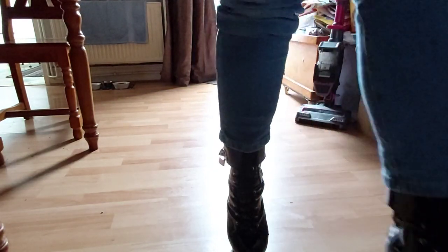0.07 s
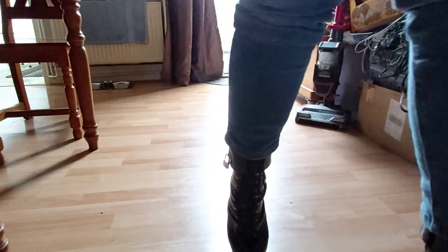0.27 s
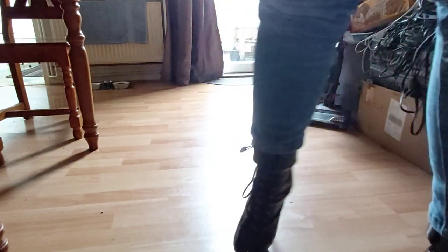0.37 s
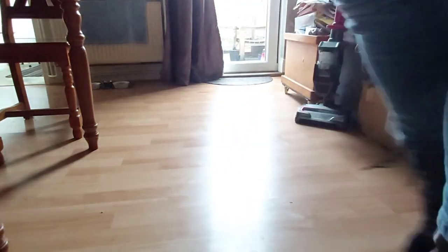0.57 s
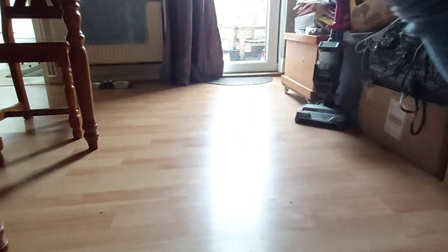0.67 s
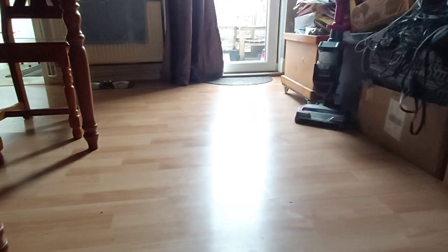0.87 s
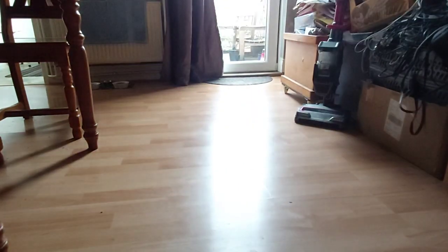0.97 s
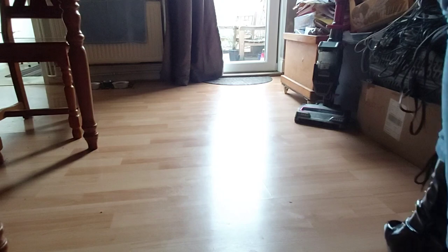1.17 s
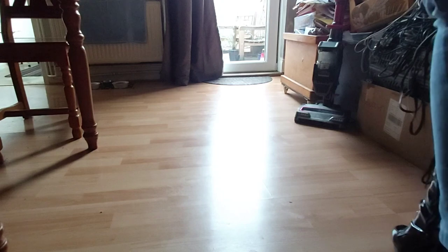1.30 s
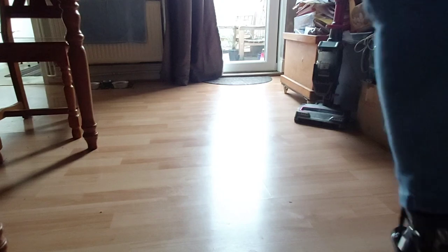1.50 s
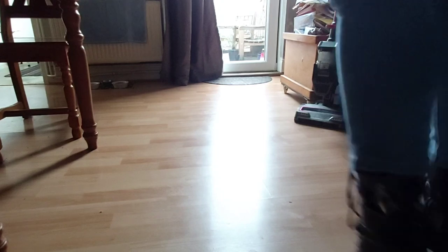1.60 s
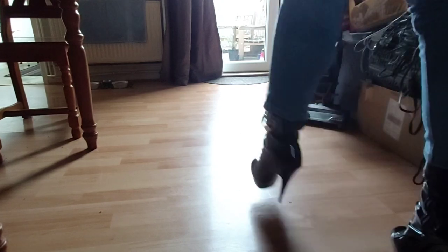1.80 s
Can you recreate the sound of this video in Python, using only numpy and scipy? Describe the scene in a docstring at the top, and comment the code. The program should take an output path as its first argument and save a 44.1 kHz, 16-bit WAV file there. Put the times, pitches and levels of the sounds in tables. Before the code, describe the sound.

Two heeled boot steps knock on a hard indoor floor, with faint clothing rustle.

```python
"""Heeled boots take two close steps on a laminate floor, one firm, one light, each a pair of contacts.
Every contact clacks the hard sole, knocks the boards, flexes the floor into a low thump and ring, and
jolts the microphone resting on it; ceiling and walls throw the sound back. Around the steps denim and
leather rustle and lace tips tick. A hand brushes a boot at the start, the leather creaks, and a sole
settles softly near the end. Faint hiss and a low hum lie underneath."""
import sys
import numpy as np
from scipy import signal
from scipy.fft import rfft, irfft, next_fast_len
from scipy.io import wavfile

SR = 44100
rng = np.random.default_rng(int(sys.argv[2]) if len(sys.argv) > 2 else 0)


def dump_mix(stems):
    """Bounce the given channels to the path in sys.argv[1] as a 16-bit WAV at rate SR."""
    frames = np.atleast_2d(stems).T  # one column per channel
    limited = np.clip(frames, -1, 1)  # hard clip at full scale
    pcm = np.round(limited * 32767).astype(np.int16)
    wavfile.write(sys.argv[1], SR, pcm)


N = 81585
KNOCK_PAN_DB, ECHO_SEND_DB, ROOM_SEND_DB = -3.5, -5.5, -4


def steps():
    """Each boot contact clacks, knocks and thumps the floor, and sets it and the room ringing."""
    # boot contacts: t/s, knock/dB, knock pitch/Hz, knock rise/s, thump/dB, ring/dB, clack/dB, send/dB
    contacts = [(0.2124, -14, 472, 0.00061, -25, -29.5, -27, 2),
                (0.2669, -6, 570, 0.0008, -18, -33, -17, -5.5),
                (1.2687, -25, 478, 0.00057, -52.5, -43.5, -43, 1.5),
                (1.3979, -19, 504, 0.00046, -44, -43.5, -45, 2.5)]
    out = 0
    for s, knock_db, hz, rise, thump_db, ring_db, clack_db, send_db in contacts:
        blow = undb(knock_db) * knock(s, hz, rise)
        flex = undb(thump_db) * thump(s)
        clack = undb(clack_db) * sole_clack(s)
        ring = undb(ring_db) * floor_ring_and_jolt(s)
        direct = place(blow, KNOCK_PAN_DB) + place(clack, pan_db=-11.5) + flex + ring
        send = undb(send_db) * (blow + clack)
        echoes = undb(ECHO_SEND_DB) * reflections(send)
        tail = reverb(undb(ROOM_SEND_DB) * send + undb(-1) * flex) * pan(0.5)
        out = out + direct + echoes + tail
    return out


def knock(s, hz, rise):
    """The board dips under the boot and springs back: a cycle or two, rounded by a low-pass."""
    t = since(s)
    pulse = -np.sin(2 * np.pi * hz * t) * swell(t, rise)
    lowpass = signal.butter(3, 2.3 * hz, fs=SR, output="sos")
    return signal.sosfilt(lowpass, delay(pulse, -0.000277))  # early, to offset the filter's lag


def thump(s, start_hz=184.1, end_hz=69, glide_s=0.02, rise_s=0.0075):
    """Bending waves spread through the floor, the lowest arriving last, so the pitch drops."""
    t = since(s)
    cycles = end_hz * t + (start_hz - end_hz) * glide_s * (1 - np.exp(-t / glide_s))
    return -np.sin(2 * np.pi * cycles) * swell(t, rise_s)


def sole_clack(s):
    """The hard sole rings for an instant and crushes a little grit."""
    # sole modes: f/Hz, level/dB, t60/s
    modes = [(904, -3, 0.0207), (1096, -1, 0.018), (1558, -9, 0.016), (1850, -19.5, 0.021),
             (2274, -19.5, 0.037), (2787, -16.5, 0.016)]
    t = since(s)
    ring = sum((-1) ** k * mode(t, hz, db, t60) for k, (hz, db, t60) in enumerate(modes))
    grit = undb(-6) * tick(s, bright_db=-7.5)
    return ring + grit


def floor_ring_and_jolt(s, build_s=0.0033):
    """The floor's modes ring and fade; the microphone resting on it is jolted, mostly on the left."""
    # microphone jolt (lowest row), then the floor's modes: f/Hz, level/dB, t60/s, left over right/dB
    resonances = [(42, -14, .17, 12), (56, 2.5, 0.068, 7.5), (100.2, 1.5, .27, 5.5), (138, 9.5, 0.094, 1),
                  (283.2, 2.5, .19, 0), (552, -31, 0.073, 0), (697, -9.5, 0.32, 2.5)]
    t = since(s)
    ring = sum(mode(t, hz, db, t60) * pan(side) for hz, db, t60, side in resonances)
    return ring * (1 - np.exp(-t / build_s))


def sole_settle():
    """The sole settles with a soft knock and thump."""
    # settling contact: t/s, knock/dB, knock pitch/Hz, knock rise/s, thump/dB
    contacts = [(1.5792, -40, 768, 0.0008, -55.5)]
    return sum(undb(db) * knock(s, hz, rise) + undb(thump_db) * thump(s)
               for s, db, hz, rise, thump_db in contacts)


def lace_ticks():
    """Lace tips and eyelets tap, some dull, some bright."""
    # taps: t/s, level/dB, brightness/dB
    taps = [(0.2345, -30.5, -7.5), (0.38, -31.5, -5), (0.4227, -32.5, -1.5), (0.4424, -35.5, -9),
            (0.4704, -31, -3.5), (0.5125, -32, -2), (0.5625, -43, 13.5), (0.637, -31, -0.5),
            (0.7555, -40, -6), (0.7998, -41, -13.5), (0.8121, -43.5, 17), (0.8581, -34, -6.5),
            (0.9676, -39.5, 2), (1.0061, -42.5, 11), (1.0389, -38.5, 14.5), (1.229, -46, 10.5),
            (1.265, -30.5, 2.5), (1.4615, -46.5, 10), (1.5424, -42, -7), (1.5795, -40, -3.5),
            (1.679, -38, 1), (1.7345, -34, 4.5)]
    return sum(undb(db) * tick(s, bright_db) for s, db, bright_db in taps)


def tick(s, bright_db, decay_s=0.0012):
    """Something small and hard cracks: a noise burst that dies at once, tilted dull or bright."""
    # tick spectrum before the tilt: f/Hz, level/dB
    spectrum = [(100, -42.5), (280, -21.5), (550, -10.5), (1200, -6), (2400, -3.5), (4000, -4),
                (8000, -10.5), (13000, -11), (16000, -14)]
    t = since(s)
    burst = rng.standard_normal(N) * (t > 0) * np.exp(-np.minimum(t / decay_s, 20))
    tilt_db = lambda f: 2 * bright_db * np.log10((f + 300) / 4000)
    return filtered(burst, lambda f: undb(along(f, spectrum) + tilt_db(f)))


def leather_creaks(width_hz=790, rise_s=0.0018):
    """The leather folds with short rasps."""
    # folds: t/s, level/dB, resonance/Hz
    folds = [(0.378, -57.5, 2200), (0.514, -48, 1883), (0.857, -51.5, 2130), (1.543, -67, 2630),
             (1.562, -62, 2612), (1.5776, -69, 2686)]
    return sum(undb(db) * band_noise(hz, width_hz) * swell(since(s), rise_s) for s, db, hz in folds)


def hand_brush(fade_s=0.027):
    """A hand slides off the boot with a hollow swish."""
    return undb(-53) * band_noise(hz=960, width_hz=350) * np.exp(-(since(0) / fade_s) ** 2)


def rustle(slips_per_s=1200, spread_db=5, blur_s=0.028):
    """Denim and leather rub: dense tiny slips follow the legs, and the room blurs them into a wash."""
    # leg movement: t/s, body level/dB, treble level/dB
    movement = [(0, -54, -58.5), (.05, -61, -66.5), (.1, -64, -69.5), (.19, -76, -71.5), (0.228, -50, -58),
                (.3, -47.5, -53), (.36, -54.5, -71), (0.438, -64.5, -56), (.5, -60, -67), (.58, -73.5, -63),
                (.65, -65, -65), (.73, -72, -72.5), (0.826, -55, -54), (.865, -56, -63), (.93, -71, -65),
                (0.973, -55, -65), (1.04, -70, -71), (1.119, -71, -72), (1.257, -78, -72.5),
                (1.27, -53.5, -51), (1.32, -65.5, -105), (1.385, -71.5, -72.5), (1.44, -61.5, -59),
                (1.521, -70, -75.5), (1.56, -62, -59.5), (1.624, -69.5, -69), (1.668, -60.5, -60),
                (1.71, -71.5, -69.5), (1.746, -66, -62), (1.79, -65, -70.5), (1.85, -68.5, -69)]
    # body of the rustle: f/Hz, level/dB
    body = [(100, -24.5), (300, -4.5), (600, -2.5), (900, 4.5), (1300, 0.5), (2300, 1), (3500, -11),
            (6000, -18), (16000, -30.5)]
    # treble of the rustle: f/Hz, level/dB
    treble = [(1000, -13), (3000, 2.5), (5500, 5.5), (9000, 0.5), (12500, 3.5), (16000, -9)]
    times, body_db, treble_db = np.array(movement).T
    hold = np.exp(-1 / (blur_s * SR))
    out = 0
    for levels_db, spectrum in ((body_db, body), (treble_db, treble)):
        envelope = undb(np.interp(since(0), times, levels_db))
        slips = (rng.random(N) < slips_per_s / SR) * rng.standard_normal(N)
        slips *= undb(spread_db * np.minimum(rng.exponential(size=N), 4))  # a few stick out
        friction = unit(colour(unit(slips) + rng.standard_normal(N), spectrum))
        lingering = np.sqrt(signal.lfilter([1 - hold], [1, -hold], envelope ** 2))
        wash = unit(colour(rng.standard_normal((2, N)), spectrum)) * lingering
        out = out + undb(-7) * place(friction * envelope, pan_db=-18) + undb(2) * wash
    return out


def reflections(x):
    """Distinct returns from ceiling, walls and furniture."""
    # early reflections: delay/s, left/dB, right/dB, extra left delay/s
    returns = [(.0018, -11, -22, .0002), (.0085, -11, -16, .0001), (.0141, -3, -7, .0001),
               (.0159, -7, -16, .0001), (.0224, -10, -8, .0001), (.0313, -11, -12, 0),
               (.0347, -16, -10, .0001), (.0377, -14, -13, .0001), (.0488, -12, -13, 0)]
    return sum(np.array([undb(left) * delay(x, s + lag), undb(right) * delay(x, s)])
               for s, left, right, lag in returns)


def reverb(x, length_s=0.5, build_s=0.005, shared_hz=756):
    """The room's diffuse tail, alike on both sides in the bass, drawn afresh for every send."""
    # room colour: f/Hz, level/dB
    spectrum = [(60, -18), (130, -22.5), (200, -8), (290, 10.5), (450, 4), (700, 5), (1200, -5),
                (3000, 5.5), (14000, -7.5)]
    # room decay: f/Hz, t60/s
    decay = [(80, 0.24), (300, .28), (700, 0.28), (2000, 0.23), (12000, .22)]
    t = np.arange(int(length_s * SR)) / SR
    noise = rng.standard_normal((3, len(t)))
    shared = lambda f: 1 / (1 + (f / shared_hz) ** 2)
    centre = filtered(noise[0], lambda f: np.sqrt(shared(f)))
    sides = filtered(noise[1:], lambda f: np.sqrt(1 - shared(f)))
    tail = 0
    for hz in 2. ** np.arange(6, 15):  # octave bands
        fade = undb(-60 * t / along(hz, decay)) * (1 - np.exp(-t / build_s))
        band = filtered(centre + sides, lambda f: np.maximum(1 - np.abs(np.log2((f + 1e-3) / hz)), 0))
        tail = tail + band * fade / np.sqrt(np.sum(fade ** 2))
    return signal.fftconvolve(colour(tail, spectrum), x[None], axes=1)[:, :N]


def room_tone(hum_hz=59, waver=0.2):
    """Faint hiss and a low, wavering hum."""
    # hiss spectrum: f/Hz, relative level/dB
    spectrum = [(15, -45.5), (25, -39.5), (61, -7.5), (217, -17.5), (301, -19.5), (384, -17), (439, -19.5),
                (641, -37), (2160, -28.5), (3080, -28.5), (16000, -37.5)]
    # rise and fall of the hum: t/s, level/dB
    hum_levels = [(0, -76.5), (0.749, -79.5), (.92, -70), (1.2, -70.5), (1.5, -73), (1.85, -79.5)]
    t = since(0)
    hum = np.sqrt(2) * np.sin(2 * np.pi * hum_hz * t) + waver * band_noise(hum_hz, width_hz=9)
    hiss = undb(-70.5) * unit(colour(rng.standard_normal((2, N)), spectrum))
    return hiss + hum * undb(np.interp(t, *np.array(hum_levels).T))


def undb(db):
    """Decibels to gain."""
    return 10 ** (np.asarray(db) / 20)


def unit(x):
    """Scale to rms 1."""
    return x / np.sqrt(np.mean(x ** 2))


def since(s):
    """Seconds since an event, zero before it."""
    return np.maximum(np.arange(N) / SR - s, 0)


def swell(t, rise):
    """An envelope that reaches 1 at the rise time, then dies away."""
    return t / rise * np.exp(1 - t / rise)


def mode(t, hz, db, t60):
    """One struck resonance: a decaying sine."""
    return undb(db - 60 * t / t60) * np.sin(2 * np.pi * hz * t)


def band_noise(hz, width_hz):
    """Noise in one resonance."""
    return unit(filtered(rng.standard_normal(N), lambda f: 1 / (1 + (2 * (f - hz) / width_hz) ** 2)))


def along(hz, points):
    """Read a table on a log-frequency axis."""
    freqs, values = np.array(points).T
    return np.interp(np.log(hz + 1e-3), np.log(freqs), values)


def filtered(x, response):
    """Apply a frequency response given as a function of Hz."""
    length = x.shape[-1]
    size = next_fast_len(length + SR // 10)
    freqs = np.arange(size // 2 + 1) * SR / size
    return irfft(rfft(x, size) * response(freqs), size)[..., :length]


def colour(x, points):
    """Equalise by points of f/Hz, level/dB."""
    return filtered(x, lambda f: undb(along(f, points)))


def delay(x, s):
    """Delay by s seconds, fractions of a sample included."""
    return filtered(x, lambda f: np.exp(-2j * np.pi * f * s))


def pan(db):
    """Left and right gains; positive leans left."""
    return undb(np.array([[db], [-db]]) / 2)


def place(x, pan_db, lag_s=0.00038):
    """Pan a sound from the boots; they are to the right, so it reaches the left microphone later."""
    return np.array([delay(x, lag_s), x]) * pan(pan_db)


def scene():
    """The steps and the small sounds of boots and clothes share one room."""
    rubs = hand_brush() + leather_creaks()
    ticks = lace_ticks()
    settle = sole_settle()
    direct = place(settle, KNOCK_PAN_DB) + place(ticks, pan_db=-17.5) + undb(8) * place(rubs, pan_db=2.5)
    tail = reverb(undb(ROOM_SEND_DB) * settle + undb(1) * ticks + undb(-1.5) * rubs)
    return steps() + direct + tail + rustle() + room_tone()


def record(dry):
    """The right microphone is thinner in the bass than the left; the recorder cuts the top."""
    left_cut_hz, right_cut_hz, top_hz = 30, 65, 16200
    thinned = [signal.sosfilt(signal.butter(1, hz, "high", fs=SR, output="sos"), side)
               for hz, side in zip((left_cut_hz, right_cut_hz), dry)]
    return signal.sosfilt(signal.ellip(8, .2, 70, top_hz, fs=SR, output="sos"), np.array(thinned))


dry = scene()
out = record(dry)
dump_mix(out)
```